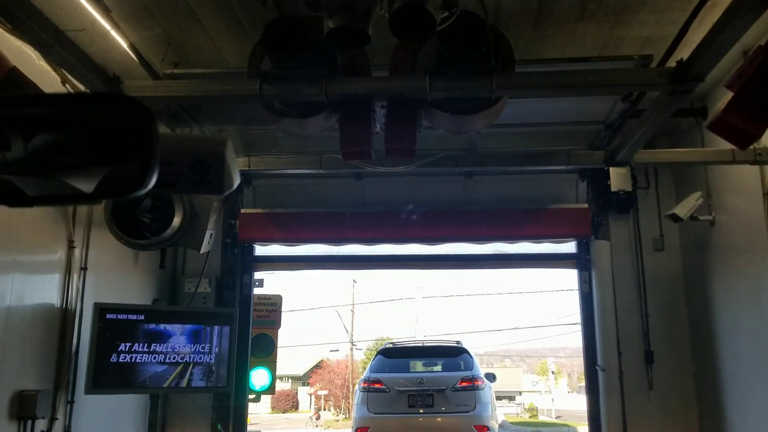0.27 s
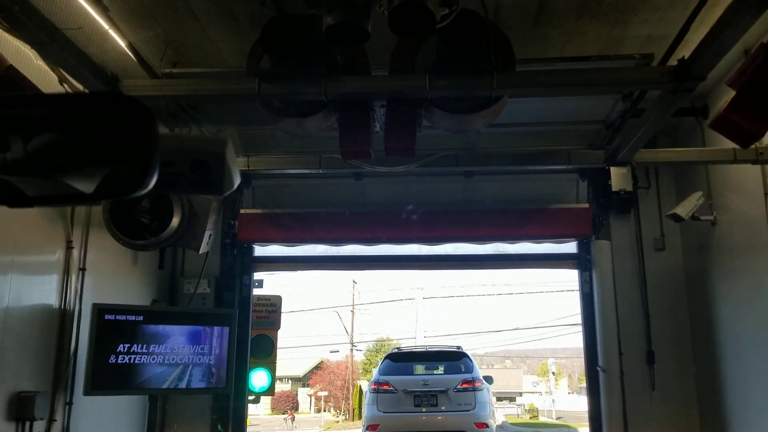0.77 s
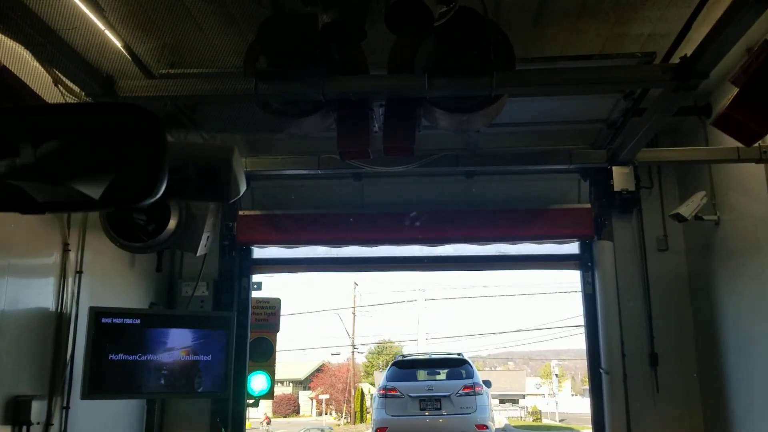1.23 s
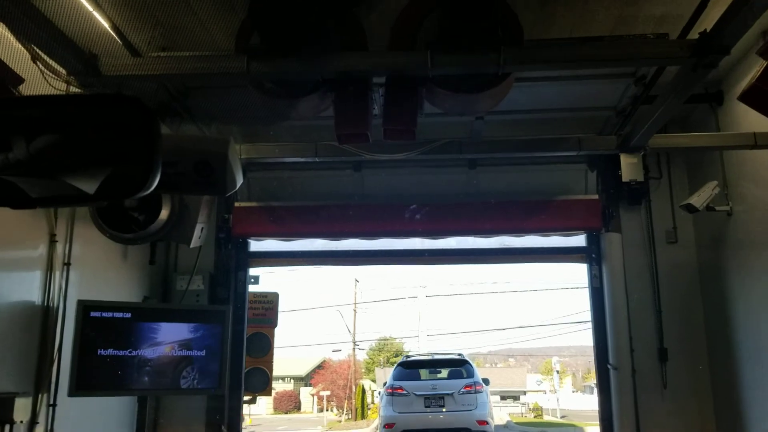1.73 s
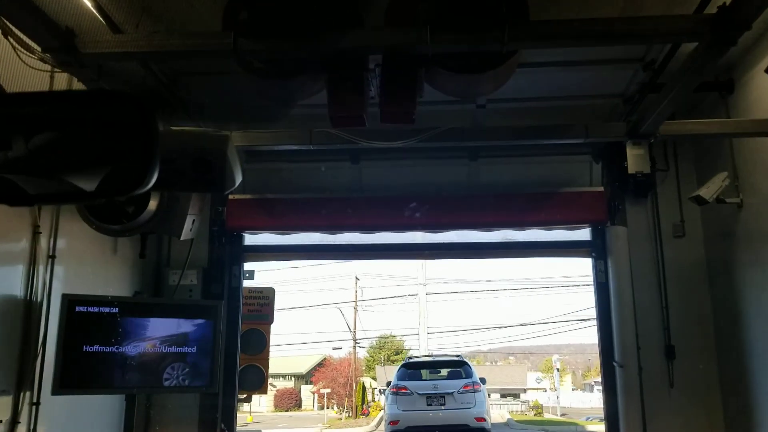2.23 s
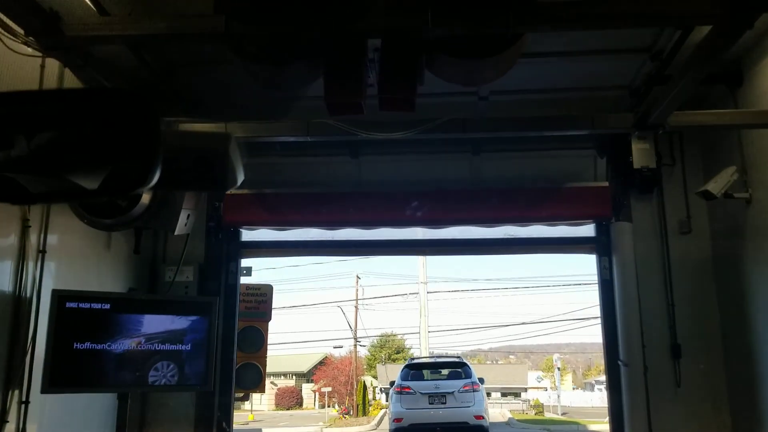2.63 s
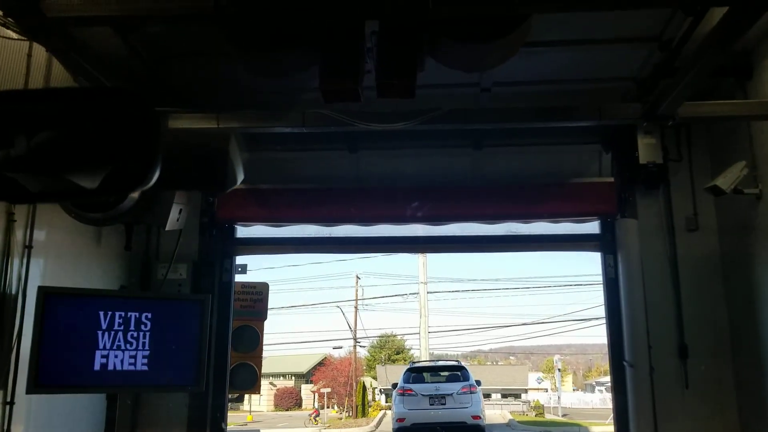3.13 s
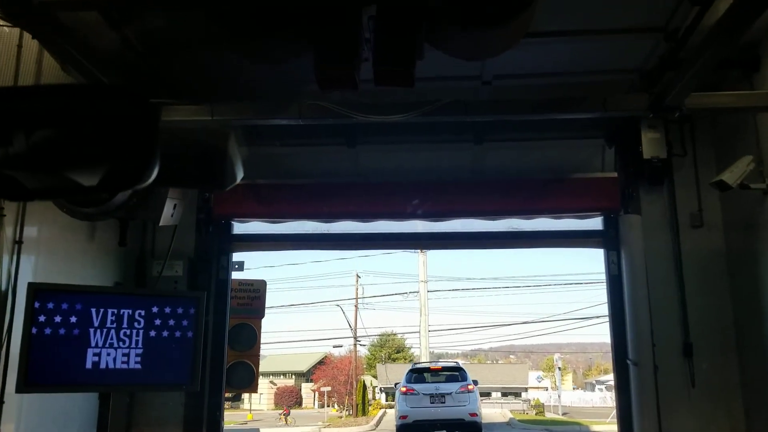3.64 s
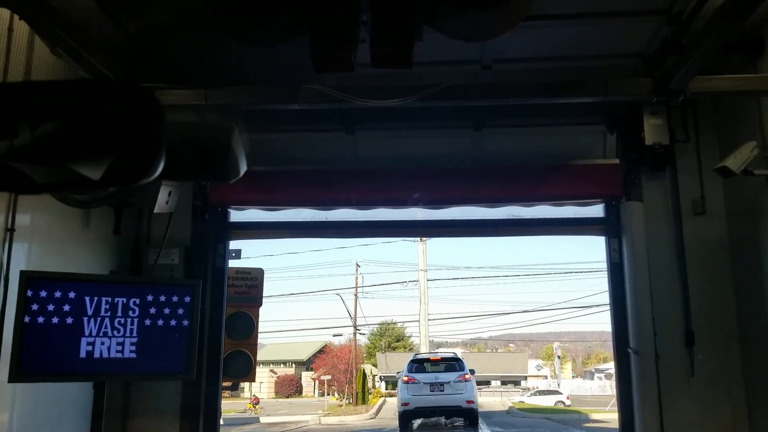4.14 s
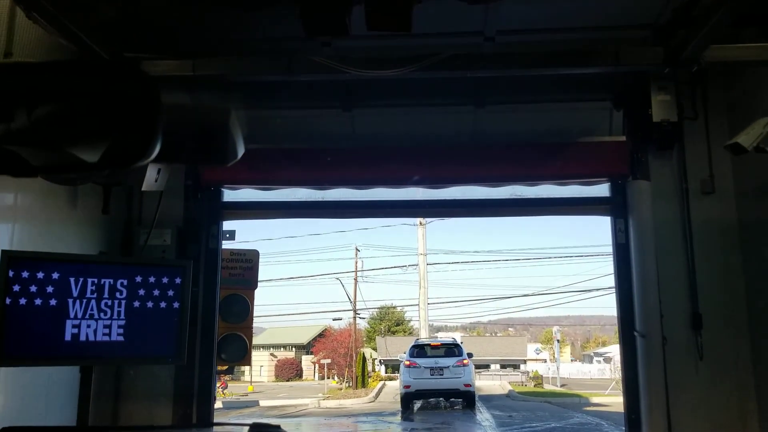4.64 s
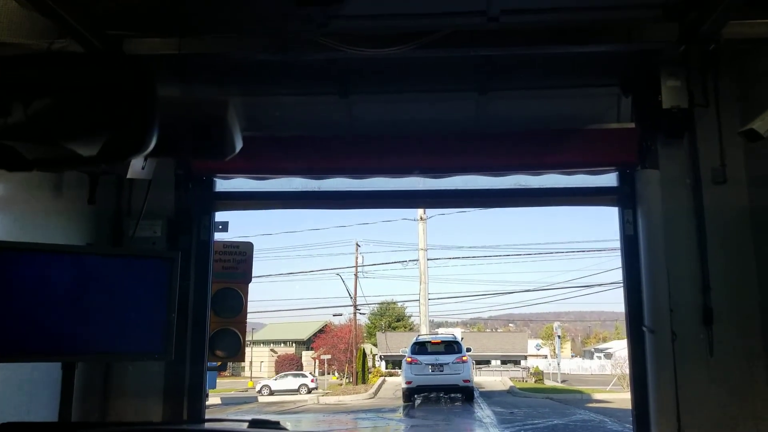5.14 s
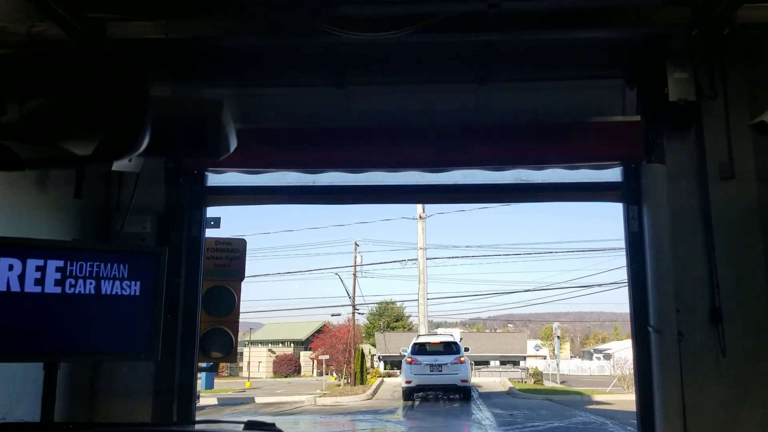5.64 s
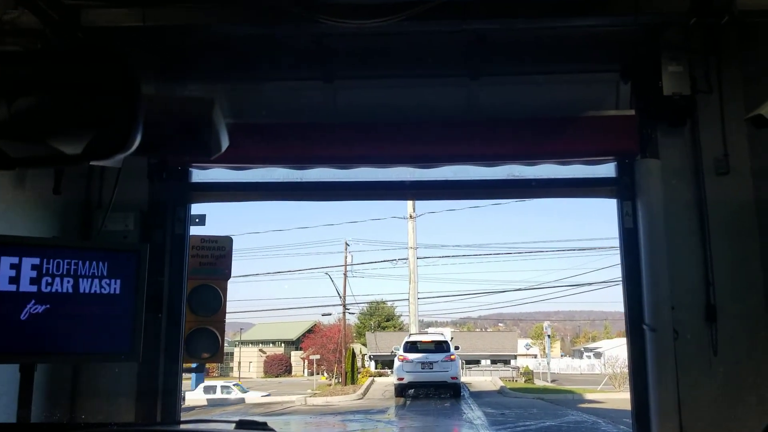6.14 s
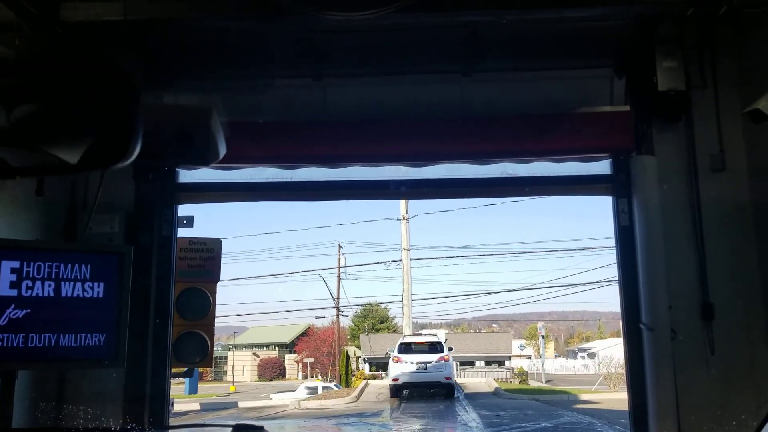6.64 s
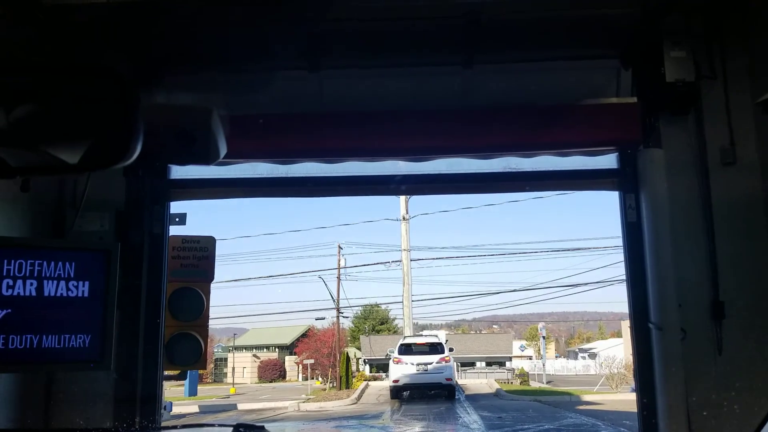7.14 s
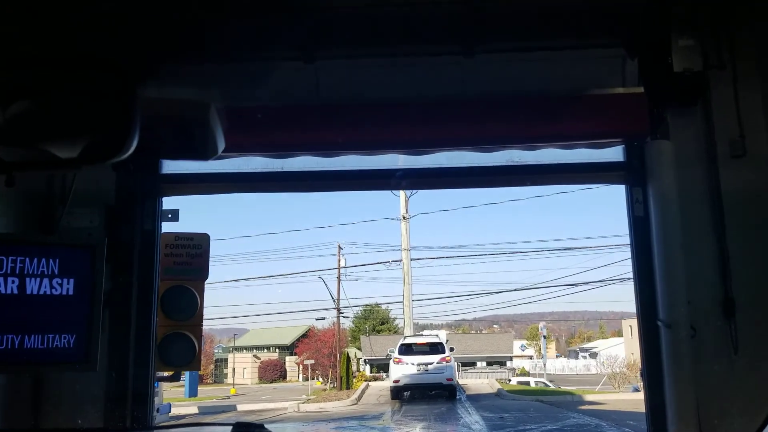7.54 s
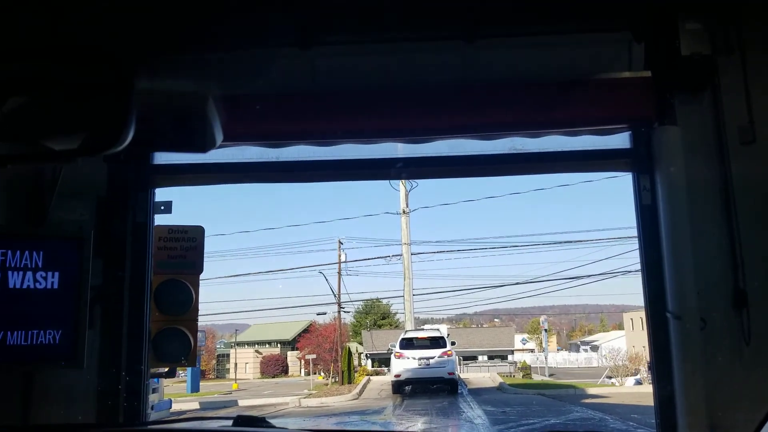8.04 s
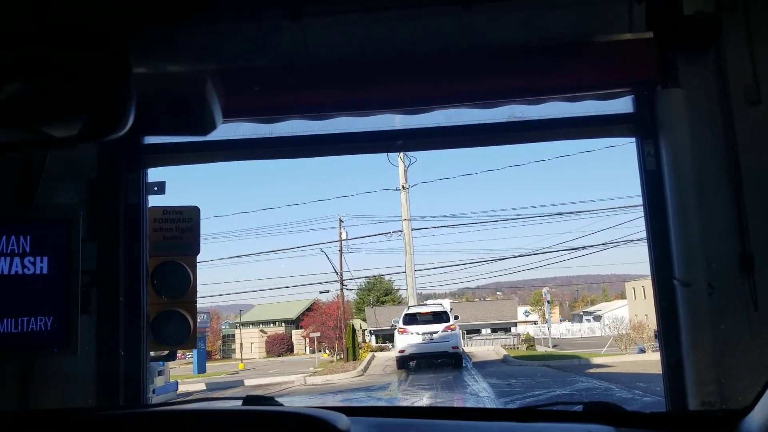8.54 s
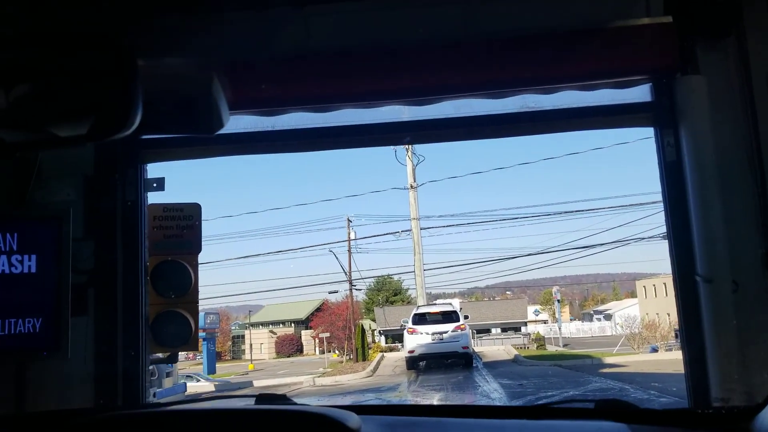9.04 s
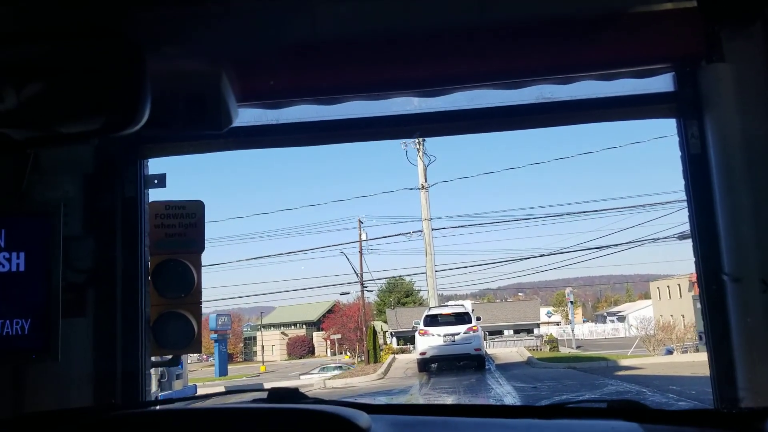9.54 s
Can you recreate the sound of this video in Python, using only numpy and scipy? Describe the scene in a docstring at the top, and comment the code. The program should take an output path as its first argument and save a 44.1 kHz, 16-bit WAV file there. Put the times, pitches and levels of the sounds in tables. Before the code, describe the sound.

Muffled low roar of car wash dryers heard from the car's cabin, swelling, dropping away after hard thuds, then building again, droplets pattering on glass.

```python
"""Inside a closed car rolling under two banks of dryers at the end of a car wash tunnel.
First blower fans (beating sines) hum over muted air (filtered noise), and drops (noise puffs) tick on the glass.
Then a blast of air builds: cabin booms, roar and rush (noise bands) swell from windscreen to rear window.
Splashes land, a thin squeak (wavering sine) passes, then thuds (ringing noise), the loudest as the blast falls away.
A second blast builds and lasts to the end, with one more thud close to it."""
import sys
import numpy as np
from scipy import signal
from scipy.fft import rfft, irfft, next_fast_len
from scipy.io import wavfile
from scipy.ndimage import uniform_filter1d, minimum_filter1d

SR = 44100
rng = np.random.default_rng(int(sys.argv[2]) if len(sys.argv) > 2 else 0)


def inscribe(sig):
    """Save sig as 16-bit PCM at rate SR to the path in sys.argv[1].

    A 1-D sig is mono; a 2-D sig holds one channel per row.
    Samples are clipped to [-1, 1] before scaling.
    """
    pcm = np.round(np.clip(np.atleast_2d(sig).T, -1, 1) * 32767)
    wavfile.write(sys.argv[1], SR, pcm.astype(np.int16))


N = 431738


def undb(db):
    """Decibels to gain."""
    return 10 ** (np.asarray(db) / 20)


def unit(x):
    """Scale to rms 1."""
    return x / np.sqrt(np.mean(x ** 2))


def bins():
    """Frequencies of the spectrum in Hz, kept at 1 or more for the logarithms."""
    return np.maximum(np.fft.rfftfreq(next_fast_len(N, True), 1 / SR), 1)


def along(points):
    """(Hz, value) points joined on a log-frequency axis."""
    hz, value = np.transpose(points)
    return np.interp(np.log(bins()), np.log(hz), value)


def shape(x, gain):
    """Filter by a gain per frequency."""
    size = next_fast_len(N, True)
    return irfft(rfft(x, size) * gain, size)[..., :N]


def below(hz, order=8):
    """Low-pass gain."""
    return 1 / np.sqrt(1 + (bins() / hz) ** (2 * order))


def above(hz, order=8):
    """High-pass gain."""
    return 1 / np.sqrt(1 + (hz / bins()) ** (2 * order))


def walk(rate_hz):
    """Random levels, held for one period of the rate and smoothed twice; rms 1."""
    hold = max(int(SR / rate_hz), 1)
    steps = np.repeat(rng.standard_normal(N // hold + 1), hold)
    slewed = uniform_filter1d(uniform_filter1d(steps, hold), hold)
    return unit(slewed[:N])


def steadied(x, span_s, share):
    """A steady jet feeds steady power: even out the slow chance swells of a noise."""
    power = uniform_filter1d(np.mean(x ** 2, axis=0), int(span_s * SR))
    return x * (power / power.mean()) ** (-share / 2)


# How each sound answers the blast, by name: clear_db (clear of the jets), under_db (anywhere under them),
# windscreen_db, roof_db, rear_db (jets on that panel), build_s, linger_s (negative: lets go early)
RESPONSE = { "rumble": (-27.5, -27, -26.5, -44.5, -29, .55, 0),
            "lower boom": (-26.5, -21.5, -21.5, -25, -22, 1.02, 0.1),
            "upper boom": (-28, -25, -23.5, -18.5, -18.5, 0.9, 0.2),
            "roar": (-21.5, -21, -26, -14.5, -33.5, 0.32, 0.1), "gusts": (-39, -39, -36, -42, -49, 0.5, 0),
            "hiss": (-46.5, -48.5, -44.5, -55, -53, 0.44, -0.34),
            "hum": (-29.5, -32, -28.5, -28, -32, .5, -2)}
# The two banks of dryers: begins_s, ends_s
PASSES = [(.82, 5.02), (6.33, 10.5)]
# Jets sweeping the car front to back: panel, middle_s, half_length_s, strength_db,
# tilt_db (from lower to upper boom; each sound takes its own share)
SWEEPS = [("windscreen", 2.43, .95, 0, -8.5), ("roof", 3.74, 0.91, .3, -.5),
          ("rear window", 4.96, 0.4, 0, -1), ("windscreen", 7.45, 0.54, -.6, 4.3), ("roof", 8.54, 1, -4, 0),
          ("rear window", 9.68, 0.29, 1.7, 1.5)]


def blast_level_db(sound, tilt_share=0):
    """Level of one sound: it builds up under each bank, swells as the jets cross each panel, and falls back."""
    clear_db, under_db, windscreen_db, roof_db, rear_db, build_s, linger_s = RESPONSE[sound]
    panel_db = {"windscreen": windscreen_db, "roof": roof_db, "rear window": rear_db}
    release_s = 0.13
    t = np.arange(N) / SR
    blast = 0
    for begins_s, ends_s in PASSES:
        attack = np.clip((t - begins_s) / build_s, 0, 1)
        release = np.clip(1 - (t - ends_s - linger_s) / release_s, 0, 1)
        blast = blast + attack * release
    power = undb(under_db) ** 2
    for panel, middle_s, half_length_s, strength_db, tilt_db in SWEEPS:
        swell = np.exp(-((t - middle_s) / half_length_s) ** 2)
        power = power + swell * undb(panel_db[panel] + strength_db + tilt_share * tilt_db) ** 2
    return 10 * np.log10(undb(clear_db) ** 2 + blast ** 2 * power)


# Cabin resonances: centre_hz, width_hz, left_db, right_db (lift on each side)
CABIN = [(124, 34, 4.5, 2), (180, 31, 3.5, 4.5), (199, 18.4, -5, -8), (271, 35, 0, 2), (234, 40, 2.5, -1),
         (412, 54, -0.5, -4.5), (537, 74, -1.5, 0.5), (902, 110, 2.5, 1), (973, 15, 4, 0),
         (1307, 200, 2.5, 2.5), (2100, 1830, -1, 4)]
# Likeness of the two sides: frequency_hz, correlation (no unit)
LIKENESS = [(50, 0.97), (140, .97), (220, 0.89), (400, 0.82), (520, 1), (640, 0.13), (900, 0.13),
            (1150, -0.39), (2000, 0.039), (4000, -0.032)]
# Left minus right, before the resonances: frequency_hz, balance_db
BALANCE = [(50, 2.5), (150, -1.5), (450, 3), (700, 2.5), (6500, 0.5), (8300, 5), (11500, 0), (15000, 4.5)]


def cabin_noise(gain, lag_s=0.00024):
    """Turbulence in the cabin: resonances colour each side, long waves reach both alike, low mids the left first."""
    common, opposed = rng.standard_normal((2, N))
    alike = np.clip(along(LIKENESS), -.995, .995)
    sides = np.array([[1], [-1]])
    pair = shape(common, np.sqrt(1 + alike)) + sides * shape(opposed, np.sqrt(1 - alike))
    colour_db = sides * along(BALANCE) / 2
    for centre_hz, width_hz, left_db, right_db in CABIN:
        peak = 1 / (1 + (2 * (bins() - centre_hz) / width_hz) ** 2)
        colour_db = colour_db + np.array([[left_db], [right_db]]) * peak
    lag_band = above(200, order=2) * below(750, order=4)
    lead = np.exp(1j * np.pi * sides * bins() * lag_s * lag_band)
    pair = shape(pair, gain * undb(colour_db) * lead)
    return pair / np.sqrt(np.mean(pair.mean(axis=0) ** 2))  # the sum of both sides sets the level


def blowers(hum_db, neighbour_db=-10.5, far_db=-15, octave_db=-24):
    """The nearest fan sings at its blade rate; its neighbour runs slightly fast and beats steadily, a far one wanders."""
    fan_hz, beat_hz = 468.3, 2.36
    t = np.arange(N) / SR
    near = np.cumsum(fan_hz + 0.6 * walk(6)) / SR
    far = np.cumsum(fan_hz + 1.735 * walk(4)) / SR
    neighbour = near + beat_hz * t
    hum = 0
    for turns, db in [(near, 0), (neighbour, neighbour_db), (far, far_db)]:
        phase = 2 * np.pi * turns + np.array([[.25], [0]])  # it reaches the left side first
        hum = hum + undb(db) * (np.sin(phase) + undb(octave_db) * np.sin(2 * phase))
    side_db = np.array([[1.6], [-1.6]])
    return unit(hum) * undb(hum_db + 0.4 * walk(27) + side_db)


def squeak(middle_s=3.98, half_length_s=0.036, pitch_hz=10960, level_db=-55):
    """One thin, very high squeak: a slightly wavering sine that swells and fades."""
    t = np.arange(N) / SR - middle_s
    tone = np.sin(2 * np.pi * np.cumsum(pitch_hz + 25 * walk(60)) / SR)
    return undb(level_db) * np.exp(-(t / half_length_s) ** 2) * tone


# Splashes of drops on the windscreen: peak_s, level_db (relative), decay_s
SPLASHES = [(2.2553, -47, 0.025), (2.3196, -42, 0.025), (2.6903, -42, 0.023), (3.8494, -43, 0.025),
            (4.557, -47, 0.025), (4.8339, -45, 0.025), (4.8998, -50, 0.025), (5.1612, -48, 0.025),
            (5.6331, -47, 0.025), (7.1801, -45, 0.025), (7.5168, -46, 0.025), (7.5887, -42, 0.025),
            (7.8794, -50, 0.025), (8.6991, -49, 0.025), (9.5766, -47, 0.025)]
# Colour of a drop's tick: frequency_hz, gain_db
TICK = [(2000, -6), (4500, 6.5), (7000, 2), (8200, -3.5), (9900, -4), (10700, 4.5), (12000, 3), (14000, 0),
        (15500, -1.5)]


def drops(hiss_db, per_s=35, scatter=.8, splash_per_s=1300, tick_s=.0005):
    """Single drops tick on the glass all along; now and then a splash lands as a cluster of them."""
    t = np.arange(N) / SR
    strength = np.exp(scatter * np.minimum(rng.standard_normal(N), 2))
    lone = (rng.random(N) < per_s / SR) * strength
    rise_s = .006
    spread = 0
    for peak_s, level_db, decay_s in SPLASHES:
        fall = np.maximum((peak_s - t) / rise_s, (t - peak_s) / decay_s)
        spread = spread + undb(level_db) * np.exp(-fall)
    cluster = unit((rng.random(N) < splash_per_s / SR) * rng.standard_normal(N))
    # a stronger blast throws more water, in flurries
    wetness_db = 1.3 * (hiss_db - np.mean(hiss_db)) + 2.5 * walk(9)
    hits = unit(lone) * undb(wetness_db - 67) + cluster * spread * undb(-1.5)
    keep = np.exp(-2 / (tick_s * SR))  # each drop bursts in a tiny puff of noise
    bursts = np.sqrt(signal.lfilter([1 - keep], [1, -keep], hits ** 2 + 1e-18))
    return shape(bursts * rng.standard_normal((2, N)), undb(along(TICK)))


# Thuds through the body: start_s, level_db (before the envelope), length_s, corner_hz (brightness)
THUDS = [(4.554, -27.5, .012, 2600), (4.786, -18, 0.03, 520), (5.29, -9.5, .005, 1900),
         (5.298, -7, 0.026, 1790), (9.686, -12, 0.05, 680)]
# What the body panels ring with: centre_hz, width_hz, level_db (relative)
THUD_MODES = [(280, 110, 5.5), (378, 95, 8.5), (562, 76, 13.5), (660, 87, 4.5), (896, 57, 9.5),
              (1030, 70, -5.5), (1250, 180, -7), (1510, 360, -8.5), (2070, 480, -24)]


def thuds(decay_s=0.027, crack_db=-37):
    """A sudden dense rattle rings the body panels, with a faint bright crack, and dies away."""
    power = 0
    for centre_hz, width_hz, level_db in THUD_MODES:
        power = power + undb(2 * level_db) / (1 + (2 * (bins() - centre_hz) / width_hz) ** 2)
    ring = np.sqrt(power) * above(200, order=3)
    crack = undb(crack_db) * below(3600, order=1)
    out = 0
    for start_s, level_db, length_s, corner_hz in THUDS:
        t = np.arange(N) / SR - start_s
        attack = np.clip(t / .004, 0, 1)
        push = attack * np.exp(-np.maximum(t - length_s, 0) / decay_s)
        knocks = rng.standard_normal((2, N))
        crossed = knocks + 0.16 * knocks[::-1]  # each side hears a little of the other
        panels = shape(crossed, ring * below(corner_hz, order=2) + crack)
        out = out + undb(level_db) * push * unit(steadied(panels, span_s=0.016, share=.8))
    return out


def reflections(depth_db=1.6, count=24):
    """Short echoes between glass, roof and dashboard comb the air's colour, differently on each side."""
    size = 2 ** 13
    echoes = np.zeros((2, size))
    for side in echoes:
        delays = rng.integers(SR // 500, SR // 40, count)  # 2 to 25 ms
        side[delays] = rng.standard_normal(count)
    echo_hz = np.fft.rfftfreq(size, 1 / SR)
    ripple = [np.interp(bins(), echo_hz, unit(rfft(side).real)) for side in echoes]
    return undb(depth_db * np.array(ripple))


# Colour of the rushing air: frequency_hz, gain_db
RUSH = [(350, -31), (600, -2.5), (798, -11.5), (927, -8.5), (1110, -11.5), (1360, -14.5), (2370, -23),
        (4750, -26.5), (7740, -42), (10000, -46.5), (11800, -44), (15500, -51.5)]


def rush(gust_db, hiss_db):
    """Air tearing past the glass: a gusty lower part and a smooth hiss."""
    colour = undb(along(RUSH)) * reflections()
    gusty = cabin_noise(colour * above(637) * below(2120, order=3)) * undb(.5 * walk(25))
    hiss = cabin_noise(colour * above(2245, order=3)) * undb(0.3 * walk(14))
    return gusty * undb(gust_db) + hiss * undb(hiss_db)


# Colour of the buffeted body: frequency_hz, gain_db
BODY = [(13, -41.5), (22, -26.5), (40, -5), (80, -4.5), (122, 4), (167, 3.5), (201, 0), (240, -4.5),
        (320, -8), (407, -7.5), (466, -9), (502, -10.5), (549, -11.5), (620, -20), (800, -27.5),
        (1040, -53.5), (1760, -120)]


def buffeting(rumble_db, lower_db, upper_db, roar_db):
    """The jets rock the whole body, boom in two cabin modes and drum on roof and glass."""
    body = undb(along(BODY))
    rumble = steadied(cabin_noise(body * below(89)), span_s=0.5, share=1.0)
    lower = steadied(cabin_noise(body * above(84) * below(144.6)), span_s=.16, share=.7)
    upper = steadied(cabin_noise(body * above(148.5) * below(194)), span_s=.16, share=0.96)
    roar = steadied(cabin_noise(body * above(207.2) * below(874)), span_s=0.12, share=0.56)
    flutter = undb(.5 * walk(35))
    booms = lower * undb(lower_db) + upper * undb(upper_db)
    return rumble * undb(rumble_db) + booms + roar * flutter * undb(roar_db)


def scene():
    """Everything heard from the front seat."""
    hiss_db = blast_level_db("hiss")  # the hiss also sets how much water flies
    rumble_db = blast_level_db("rumble", -.5)
    lower_db = blast_level_db("lower boom", -0.052)
    upper_db = blast_level_db("upper boom", 0.79)
    body = buffeting(rumble_db, lower_db, upper_db, blast_level_db("roar"))
    air = rush(blast_level_db("gusts"), hiss_db)
    hum = blowers(blast_level_db("hum"))
    return hum + squeak() + drops(hiss_db) + thuds() + air + body


def record(dry):
    """A limiter ducks both sides together at the highest peaks, and a steep low-pass cuts the top."""
    ceiling, span, top_hz = .93, SR // 80, 15700
    room = np.minimum(1, ceiling / (np.abs(dry).max(axis=0) + 1e-9))
    gain = uniform_filter1d(minimum_filter1d(room, span), span)
    low_pass = signal.ellip(10, .1, 80, top_hz, fs=SR, output="sos")
    return signal.sosfilt(low_pass, dry * gain)


dry = scene()
out = record(dry)
inscribe(out)
```